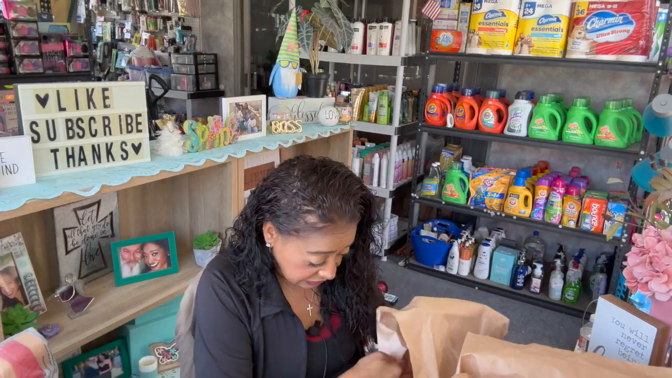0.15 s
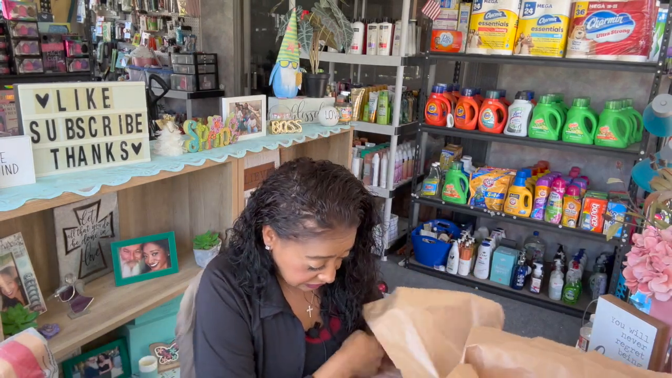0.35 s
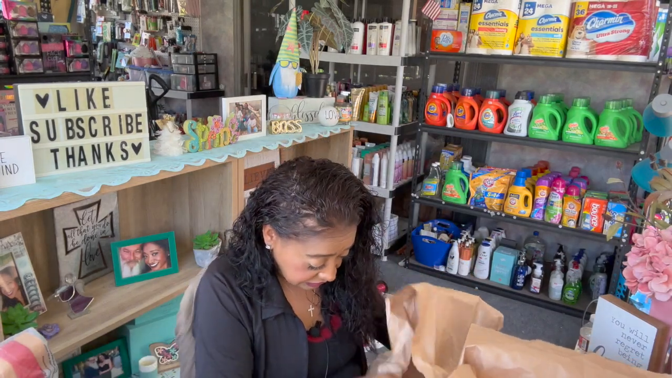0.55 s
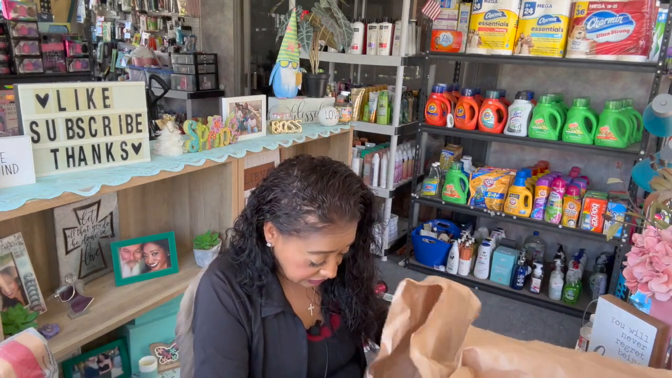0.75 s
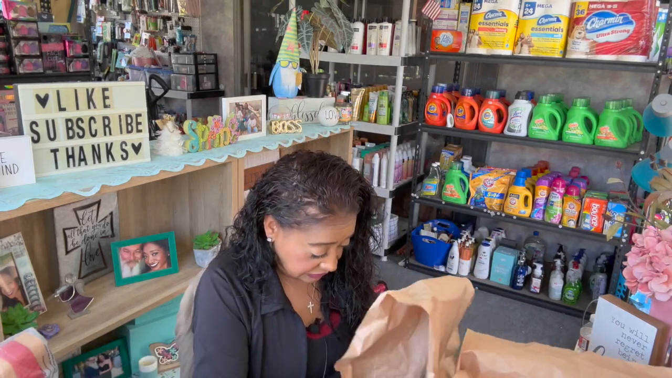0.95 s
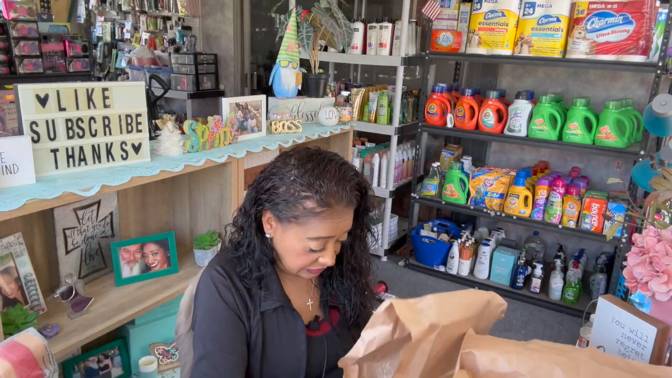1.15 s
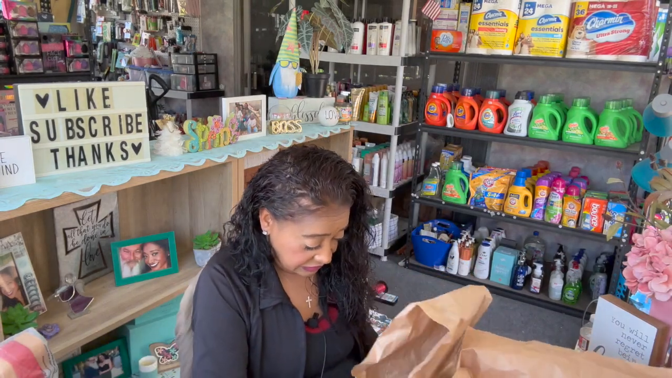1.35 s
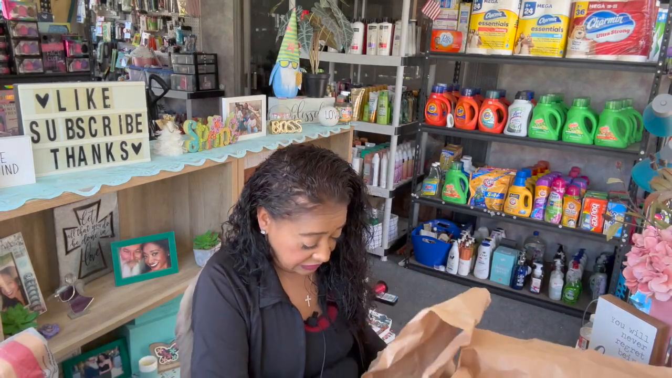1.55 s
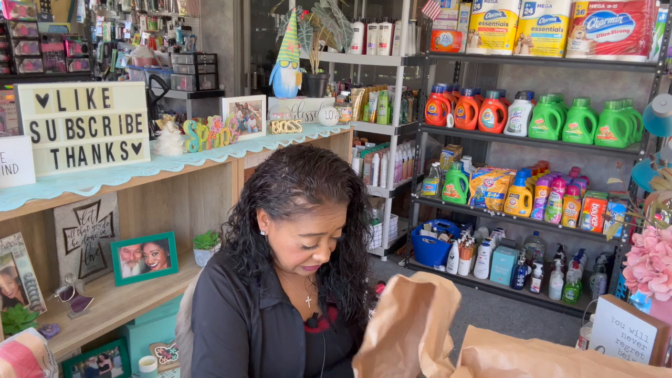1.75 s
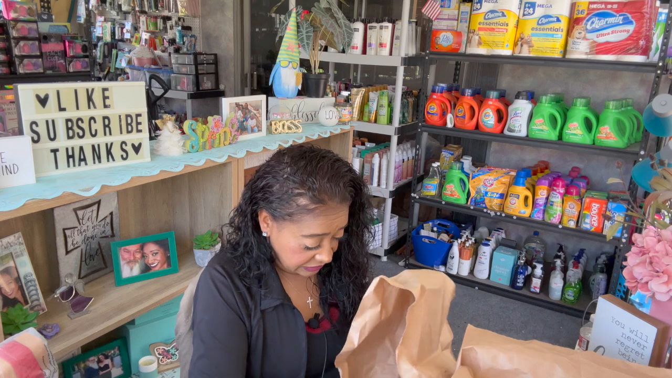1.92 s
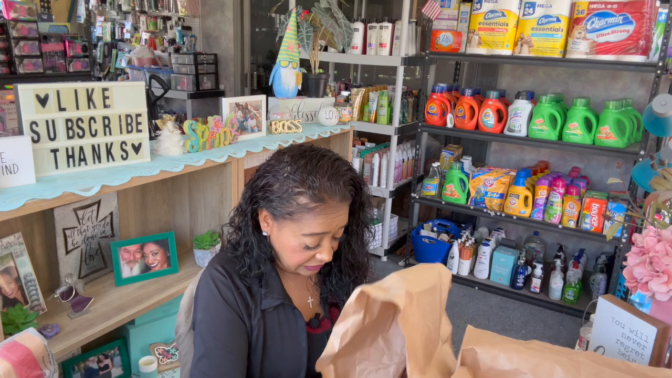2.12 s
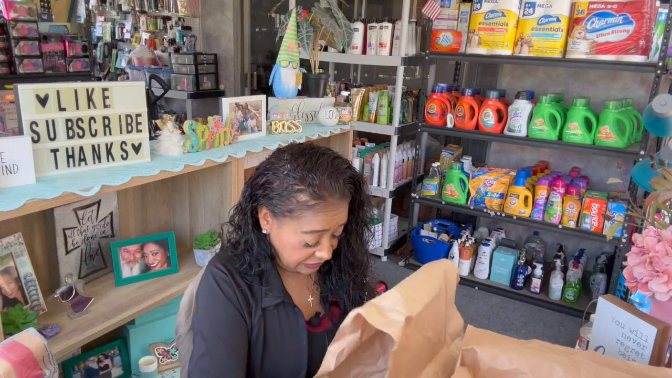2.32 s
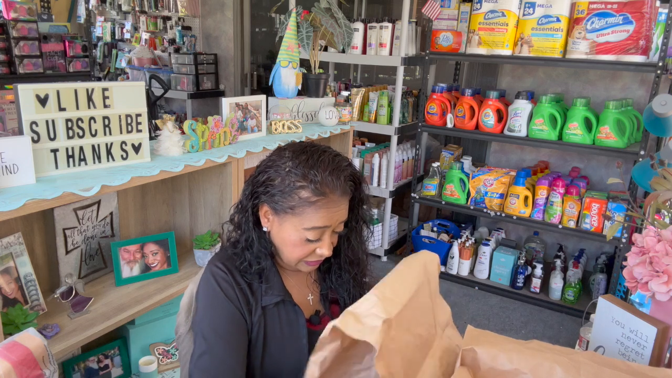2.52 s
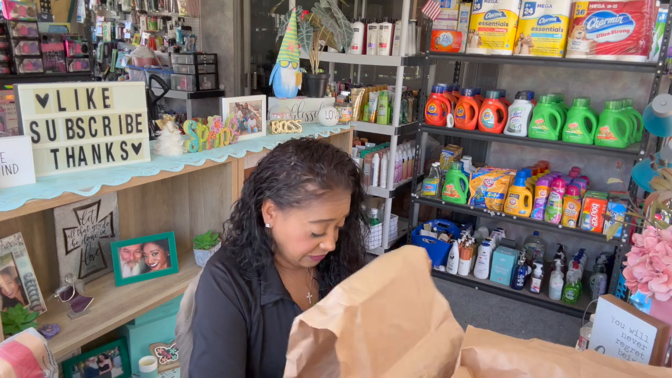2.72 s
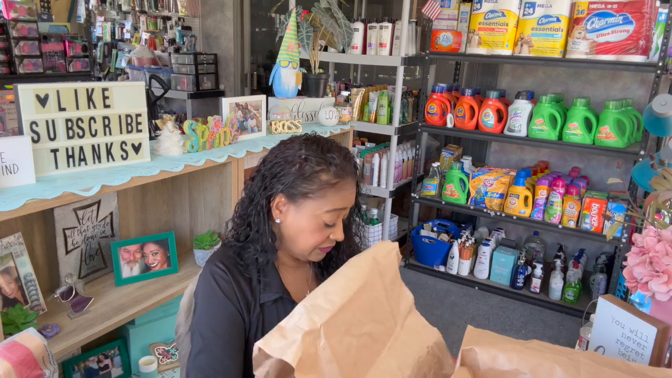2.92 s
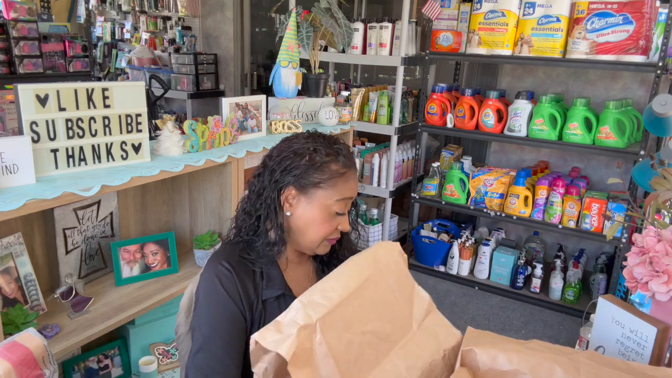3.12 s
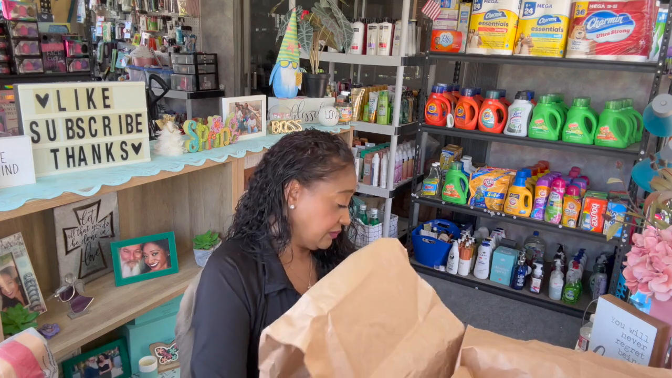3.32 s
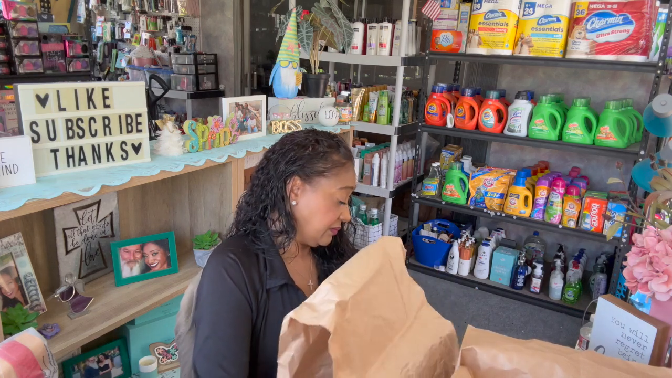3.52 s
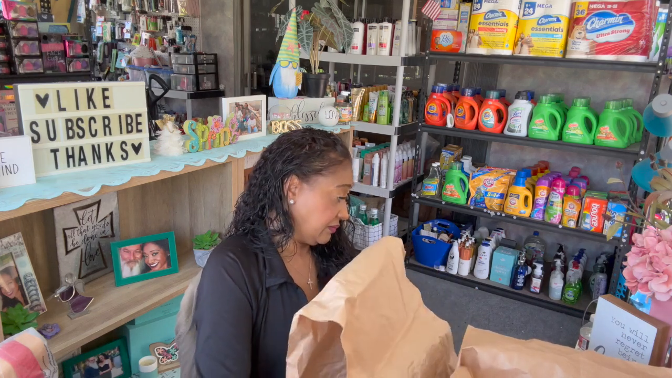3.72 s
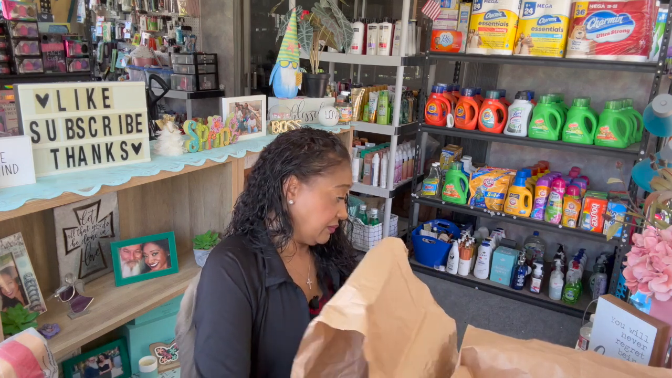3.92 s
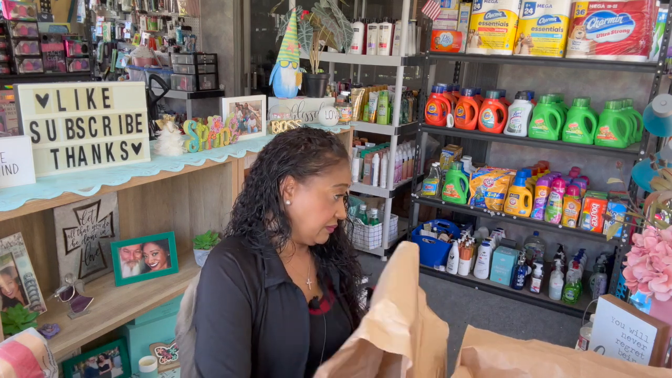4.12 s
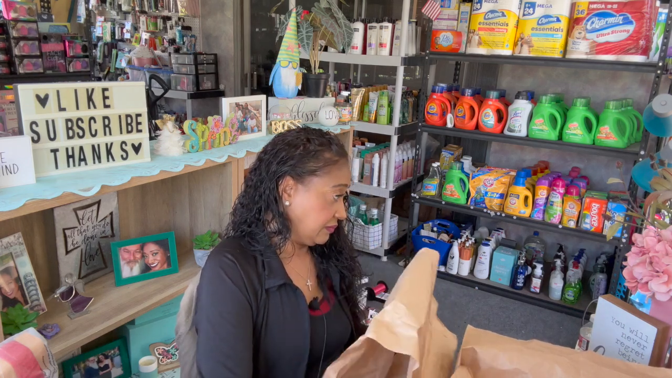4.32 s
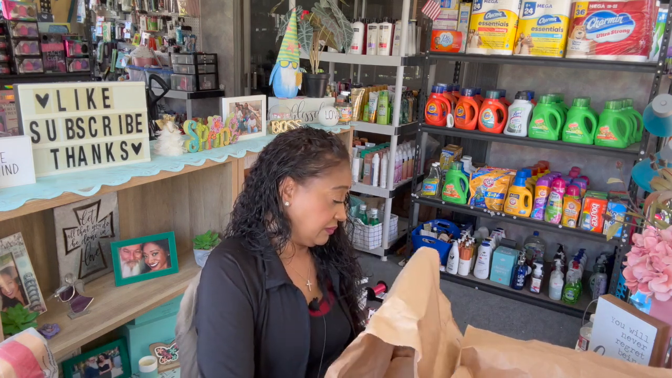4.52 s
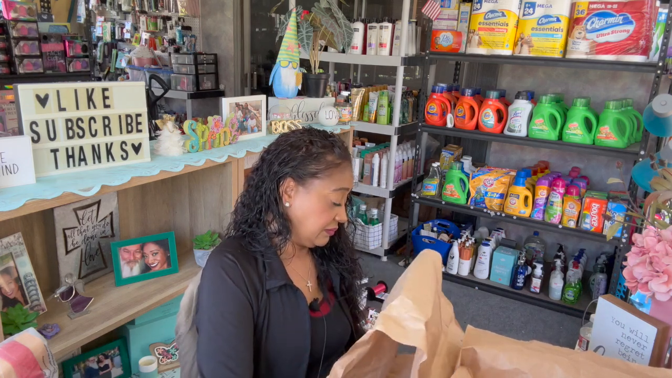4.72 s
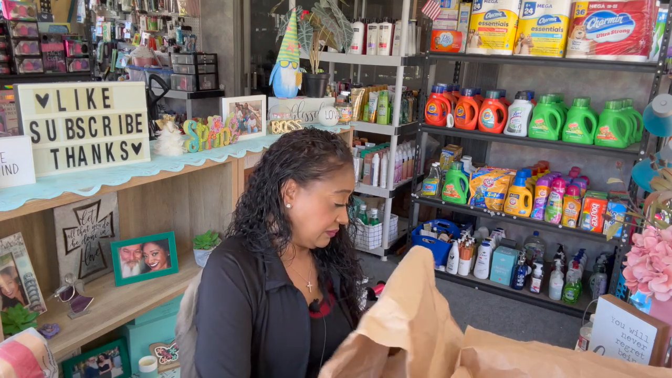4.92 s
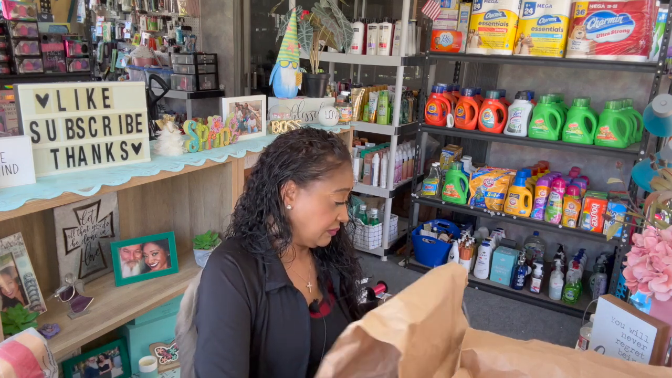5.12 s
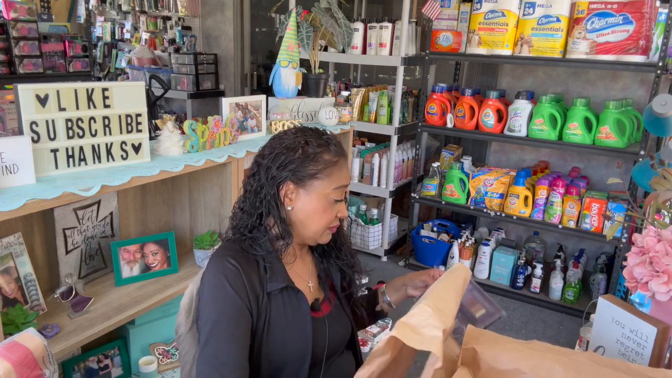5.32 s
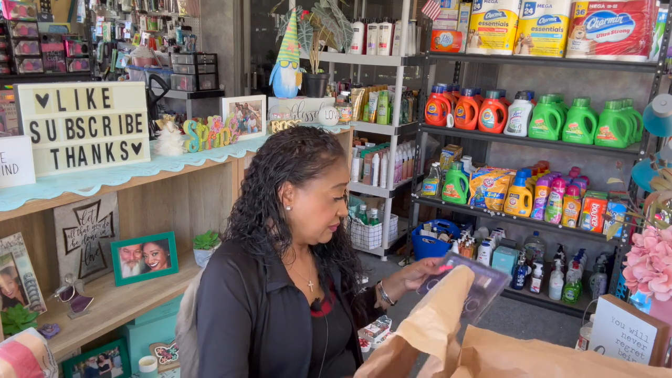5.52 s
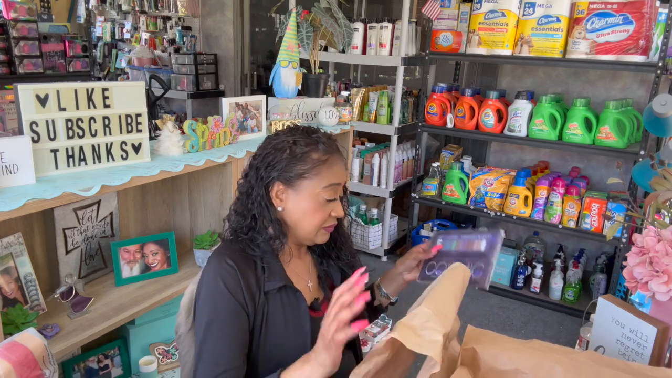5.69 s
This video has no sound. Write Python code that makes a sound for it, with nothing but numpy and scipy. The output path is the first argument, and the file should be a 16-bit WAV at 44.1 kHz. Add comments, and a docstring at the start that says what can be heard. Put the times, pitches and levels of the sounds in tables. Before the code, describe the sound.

A person digs through crinkly kraft paper, heard near the microphone indoors. Uneven squeezes come several times a second, each a burst of fine crackles and dry rustling, dotted with bright ticks and duller pops. A few low, soft thumps of moving paper peak just before three seconds. The handling then lightens, briefly picks up around five seconds, and dies to faint rustle. The room is dry, with little echo and slightly softened top treble.

```python
"""A small, well-filled room, where hands crumple a large sheet of kraft paper close by.
Countless small creases crackle in clumps and paper rubs on paper: clouds of tiny rings mixed with noise.
Larger creases snap one by one, each a decaying tone of its flat facet with bursts of coloured noise.
The whole sheet flaps in the bass and pushes air in soft, damped swings.
A short echo of the room and a faint noise hiss lie around it."""
import sys
import numpy as np
from scipy import signal
from scipy.fft import rfft, irfft, next_fast_len
from scipy.io import wavfile
from scipy.ndimage import uniform_filter1d, map_coordinates

SR = 44100
rng = np.random.default_rng(int(sys.argv[2]) if len(sys.argv) > 2 else 0)


def wrap_up_sound(samples):
    """Save the sound to the file named by the first command line argument, as 16-bit audio."""
    columns = np.atleast_2d(samples).T
    # keep every value between -1 and 1, then stretch to whole-number steps
    tamed = np.clip(columns, -1, 1)
    steps = np.round(tamed * 32767).astype(np.int16)
    wavfile.write(sys.argv[1], SR, steps)


N = 253833  # length in samples

# Squeezes of the paper. Each row: peak time in seconds, swell in seconds, fade in seconds,
# crackle level in dB, rub level in dB over the crackle, flap level in dB over the crackle.
SQUEEZES = [(0.01, 0.079, 0.19, -29, 0, -6), (0.152, 0.031, 0.091, -36, -9.5, -3.5),
            (0.214, 0.0091, 0.078, -30.5, 1, -13), (0.312, 0.055, 0.19, -26, -1.5, -5.5),
            (0.45, 0.095, 0.22, -29, -4, -4), (0.515, 0.028, 0.018, -30, -1.5, 5),
            (0.638, 0.035, 0.046, -27.5, -18, -5.5), (0.72, 0.024, 0.12, -39.5, -11, -24),
            (0.8, 0.02, 0.21, -35, -16, -10), (0.9, 0.12, 0.4, -30, -13.5, -4),
            (1.038, 0.056, 0.12, -25.5, -7.5, -9.5), (1.133, 0.057, 0.06, -33, -1, -5.5),
            (1.21, 0.016, 0.21, -43.5, -1, -6.5), (1.633, 0.086, 0.053, -37, 9.5, -24),
            (1.654, 0.041, 0.1, -25.5, -5, -7), (1.8, 0.12, 0.57, -33, -5.5, -11.5),
            (1.87, 0.029, 0.17, -35, 4.5, -11), (2.01, 0.091, 0.02, -25.5, -0.5, 1),
            (2.07, 0.026, 0.22, -46, -12.5, -3.5), (2.206, 0.084, 0.06, -21.5, 2, -5),
            (2.397, 0.053, 0.022, -33, -1.5, -10), (2.51, 0.036, 0.18, -32.5, 3, -4.5),
            (2.609, 0.069, 0.041, -37.5, -1, 4), (2.721, 0.013, 0.25, -26.5, -4, -6),
            (2.798, 0.08, 0.11, -27, -3, -1.5), (2.995, 0.0097, 0.069, -37, -27, -5),
            (3.142, 0.063, 0.059, -41, 3, -1), (3.243, 0.062, 0.035, -28.5, 3.5, -10.5),
            (3.299, 0.009, 0.042, -44.5, 10.5, 2), (3.382, 0.027, 0.016, -36.5, -32, -13),
            (3.462, 0.042, 0.033, -48.5, 2, -3.5), (3.544, 0.031, 0.037, -49, -5.5, 6),
            (3.644, 0.031, 0.14, -41.5, 1, -13.5), (3.853, 0.0052, 0.05, -30, -3, -8.5),
            (3.935, 0.053, 0.12, -41.5, -2.5, -5), (4.105, 0.021, 0.067, -35.5, 0, -3),
            (4.19, 0.14, 0.041, -47.5, 10, -3.5), (4.252, 0.021, 0.017, -42.5, -25, 0.5),
            (4.416, 0.014, 0.16, -50.5, 15.5, -27), (4.468, 0.035, 0.085, -39, -1, 2.5),
            (4.573, 0.019, 0.03, -46.5, 3, 6.5), (4.64, 0.037, 0.11, -49, 9, 5.5),
            (4.693, 0.029, 0.09, -34, -0.5, -5.5), (4.83, 0.014, 0.23, -33, 0.5, -13.5),
            (4.93, 0.12, 0.067, -32, 5, -10), (5.021, 0.011, 0.042, -29.5, -4.5, -9.5),
            (5.078, 0.035, 0.071, -29.5, 2.5, -1.5), (5.191, 0.045, 0.035, -34.5, 3, -1.5),
            (5.545, 0.013, 0.086, -61.5, -12, 18.5), (5.657, 0.015, 0.083, -53.5, 13, -13)]
SWING_DB = 20  # how far a squeeze climbs in its swell time and sinks in its fade time
ROUNDNESS = 1.62  # exponent; over 1 gives a broad top and steep ends

# Paper settling between squeezes. Each row: time in seconds, crackle level in dB.
SETTLING = [(0, -54), (0.7, -47), (1.2, -48), (1.45, -48.5), (2.05, -44), (2.44, -47.5), (3.1, -72),
            (3.5, -59.5), (4.05, -56.5), (4.29, -56.5), (4.39, -66), (4.6, -46), (5.23, -48), (5.52, -79.5),
            (5.6, -60.5), (5.76, -69)]
SETTLING_RUB_DB, SETTLING_FLAP_DB = -6.5, -8.5  # over the settling crackle

# Tone colours of the small creases, the rubbing and the flapping sheet.
# Each row: frequency in Hz, relative level in dB per Hz.
CRACKLE_COLOUR = [(500, -12), (1050, -10.5), (1900, -5), (3500, -8), (6000, -15.5), (12000, -41.5)]
RUB_COLOUR = [(2500, -24.5), (5000, -7), (8000, -4.5), (12000, -8), (15000, 1)]
FLAP_COLOUR = [(20, -23.5), (45, 1), (90, -2.5), (220, -3), (480, 4.5), (800, 0.5), (1300, -17.5)]

# Creases that snap. Each row: time in seconds, 1 ms before the snap sounds, relative level in dB,
# facet pitch in Hz, relative level of the treble crack in dB.
SNAPS = [(0.05, -6, 10640, -6), (0.062, -18, 9200, -7.5), (0.106, -21.5, 9300, -6.5),
         (0.141, -20.5, 1810, -0.5), (0.15, -12, 726, -30.5), (0.181, -9, 389, -24),
         (0.212, -9.5, 708, -9.5), (0.293, -13, 3304, -1.5), (0.311, -11.5, 2400, 4),
         (0.33, -6.5, 10400, -6), (0.345, -19, 445, 12), (0.359, -17.5, 540, 8), (0.505, -8, 1760, 1),
         (0.511, -21.5, 2500, 7), (0.563, -10.5, 721, -23), (0.579, -12, 2760, -11),
         (0.616, -22.5, 305, 13.5), (0.631, -21, 550, 3), (0.696, -19, 2240, -9), (0.787, -13.5, 1780, -53),
         (0.884, -15, 2300, -34), (0.938, -19.5, 1410, 2.5), (0.996, -20, 9500, -12),
         (1.014, -14.5, 3390, -6.5), (1.03, -13.5, 1500, -2), (1.103, -16, 1770, -20.5),
         (1.121, -12.5, 6840, -29), (1.144, -18.5, 1820, -22), (1.197, -14, 10100, -9.5),
         (1.24, -19, 1800, -15), (1.255, -18.5, 5130, -32), (1.285, -18, 6640, -53),
         (1.321, -19.5, 405, -8.5), (1.382, -29, 4700, -44), (1.451, -23.5, 2570, -46),
         (1.477, -21.5, 1790, -18.5), (1.534, -18.5, 1810, -46), (1.577, -20, 6900, -24),
         (1.648, -16.5, 724, -9), (1.749, -22, 2360, 5.5), (1.806, -21, 594, -6), (1.847, -9.5, 6420, -24),
         (1.854, -5.5, 6650, -21.5), (1.877, -17, 6000, -11.5), (1.919, -7, 2070, -6.5),
         (1.998, -14, 1890, -2), (2.01, -7, 1790, -9.5), (2.057, -17.5, 2100, -2.5),
         (2.091, -21.5, 2320, -11), (2.155, -11.5, 2020, -7.5), (2.201, -4.5, 7400, -11),
         (2.212, -3, 6900, -7.5), (2.283, -20, 1300, -25), (2.334, -15, 410, -39.5),
         (2.368, -23.5, 3330, -16), (2.485, -15, 2410, -1.5), (2.514, -19, 1330, -4), (2.527, -17, 323, -4),
         (2.569, -11, 3140, -26.5), (2.597, -11.5, 1470, -29.5), (2.623, -16.5, 1820, -6.5),
         (2.711, -11.5, 2260, -41), (2.743, -10.5, 477, 1), (2.774, -7, 1460, -1), (2.797, -7, 1380, 3.5),
         (2.848, -9, 2170, -37), (2.918, -16.5, 2320, -29), (2.99, -19.5, 2600, -25.5),
         (3.017, -20.5, 3770, -33), (3.106, -16.5, 2240, -7.5), (3.21, -14.5, 6200, -40),
         (3.259, -8.5, 1320, -25), (3.281, -23, 1710, -25.5), (3.293, -23, 3240, -3),
         (3.368, -23, 1110, -38.5), (3.419, -32.5, 472, 2), (3.452, -28, 2070, 1.5),
         (3.516, -20.5, 3010, -24.5), (3.54, -8, 674, -9), (3.809, -18, 1860, -23),
         (3.832, -20.5, 624, -31), (3.854, -22.5, 1200, -7.5), (3.865, -19, 3600, -22),
         (3.876, -24, 2060, -1.5), (3.915, -20, 1060, -16.5), (3.936, -20, 3370, -0.5),
         (3.977, -23.5, 2240, -50), (4.037, -28.5, 660, -42), (4.095, -35, 2000, -19),
         (4.127, -18.5, 3450, -20.5), (4.185, -19.5, 1870, -4.5), (4.248, -22.5, 4920, -35),
         (4.311, -30, 770, -41), (4.413, -14, 3010, -10.5), (4.462, -19.5, 400, -17.5),
         (4.483, -18.5, 1470, -11), (4.523, -21, 2070, -31), (4.564, -19, 2460, -29),
         (4.577, -21, 1430, -33), (4.635, -16, 1660, -34), (4.69, -9, 1750, -54), (4.763, -17.5, 1840, -45),
         (4.821, -14.5, 1690, -24), (4.83, -17, 1880, 2.5), (4.887, -19.5, 1710, 3),
         (5.017, -14.5, 627, -16.5), (5.069, -10, 1650, -18), (5.077, -12.5, 7500, -5),
         (5.155, -18, 1960, -21), (5.189, -9, 375, -3.5), (5.366, -40, 2860, -26), (5.419, -47, 4900, -40),
         (5.54, -23.5, 1340, -20), (5.58, -23.5, 1184, -40)]

# The whole sheet buckles and pushes air. Each row: start in seconds, relative level in dB, pitch in Hz.
THUDS = [(0.51, -15.5, 182), (1.991, -21, 203), (2.325, -22.5, 141), (2.508, -18, 184), (2.742, -14, 72.4),
         (2.839, -11.5, 75), (2.871, -7, 129), (3.768, -25, 123), (4.437, -19.5, 123), (5.19, -16.5, 152)]

# Decay of the room. Each row: frequency in Hz, time to fall 60 dB in seconds.
ROOM_DECAY = [(200, 0.25), (2000, 0.11), (10000, 0.032)]

# Tone colour of the faint hiss. Each row: frequency in Hz, relative level in dB per Hz.
HISS_COLOUR = [(40, -6), (1030, -10.5), (15000, -49)]

# Treble droop of the microphone. Each row: frequency in Hz, gain in dB.
MIC_RESPONSE = [(11000, -0.5), (14000, -8.5), (16000, -25)]
BAND_LIMIT_HZ = 15900


def amp(db):
    """Turns dB into gain."""
    return 10 ** (np.asarray(db) / 20)


def unit(x):
    """Scales x to rms 1."""
    return x / np.sqrt(np.mean(x ** 2) + 1e-20)


def along(points, hz):
    """Reads a curve of (Hz, value) points on a log frequency axis."""
    f, value = np.transpose(points)
    return np.interp(np.log(hz + 1), np.log(f + 1), value)


def wobble(rate):
    """Draws a smooth random curve with rate knots a second."""
    knots = rng.standard_normal(int(N * rate / SR) + 4)
    return map_coordinates(knots, [np.arange(N) * rate / SR])


def filtered(x, response):
    """Multiplies the spectrum of x by a response of frequency."""
    size = next_fast_len(N + SR // 2)
    spectrum = rfft(x, size) * response(np.fft.rfftfreq(size, 1 / SR))
    return irfft(spectrum, size)[..., :N]


def coloured(x, colour):
    """Filters x through a tone colour and scales it to rms 1."""
    return unit(filtered(x, lambda hz: amp(along(colour, hz))))


def patchy(x, depth_db, size):
    """Gives x a random gain that drifts smoothly over frequency and time; size is in frames."""
    z = signal.stft(x, nperseg=256)[2]
    field = uniform_filter1d(rng.standard_normal(z.shape), 4, -2)
    field = uniform_filter1d(field, size, -1)
    return signal.istft(z * amp(depth_db * unit(field)), nperseg=256)[1][..., :x.shape[-1]]


def grains(count, hz, octaves, cycles, spread_db, size):
    """Scatters short damped rings of varied pitch, level and life; size is in samples."""
    start, pitch, power, life = rng.random((count, 4)).T
    f = np.clip(hz * 2 ** (octaves * (2 * pitch - 1)), 20, SR / 2.2)[:, None]
    t = np.arange(size) / SR
    # many soft grains and few loud ones
    gain = amp(spread_db * np.minimum(-np.log(power + 1e-9), 4))[:, None] * np.sqrt(f)
    age = t * f / (cycles * (.5 + life[:, None]))
    swell_and_decay = age * np.exp(-age)  # the fold gives way over a few cycles
    wave = gain * np.sin(2 * np.pi * f * t) * swell_and_decay
    where = (start * N).astype(int)[:, None] + np.arange(size)
    return np.bincount(where.ravel(), wave.ravel(), N + size)[:N]


def squeezes():
    """Gains of crackle, rub and flap: each squeeze swells and fades over the settling paper."""
    t = np.arange(N) / SR
    settling_db = np.interp(t, *np.transpose(SETTLING))
    # powers are summed, hence the doubled dB
    power = amp(2 * (settling_db + np.array([[0], [SETTLING_RUB_DB], [SETTLING_FLAP_DB]])))
    for s, swell, fade, db, rub_db, flap_db in SQUEEZES:
        near = slice(max(round((s - 4 * swell) * SR), 0), round((s + 4 * fade) * SR))
        away = np.maximum((s - t[near]) / swell, (t[near] - s) / fade)
        peak = amp(2 * np.array([[db], [db + rub_db], [db + flap_db]]))
        power[:, near] += peak * amp(-2 * SWING_DB * away ** ROUNDNESS)
    return np.sqrt(power)


def small_creases(clump_db):
    """Small creases give way in clumps: brief rings over noise, with a patchy spectrum."""
    rings = unit(grains(count=8000, hz=2412, octaves=1.826, cycles=1.71, spread_db=3.5, size=500))
    crackle = patchy(rings + 0.8 * rng.standard_normal(N), depth_db=3, size=40)
    return coloured(amp(clump_db) * crackle, CRACKLE_COLOUR)


def rubbing(clump_db):
    """Paper slides on paper: high rings of more cycles in a bed of noise, rough in level."""
    rings = unit(grains(count=9000, hz=8410, octaves=0.895, cycles=7.2, spread_db=4.0, size=260))
    rub = patchy(rings + 1.6 * rng.standard_normal(N), depth_db=5.0, size=24)
    return coloured(amp(1.14 * clump_db + 1.6 * wobble(60)) * rub, RUB_COLOUR)


def flapping(clump_db):
    """The whole sheet flaps in the bass: low, heavily damped rings under noise."""
    rings = unit(grains(count=1200, hz=326.0, octaves=1.38, cycles=0.39, spread_db=4.5, size=2000))
    flap = rings + 2.68 * rng.standard_normal(N)
    return coloured(amp(0.73 * clump_db + 1.0 * wobble(29.96)) * flap, FLAP_COLOUR)


def hands():
    """The effort of the hands sets crackle, rub and flap, which share their clumps."""
    clump_db = 0.32 * wobble(25) + 3.23 * wobble(95)
    layers = [small_creases(clump_db), rubbing(clump_db), flapping(clump_db)]
    return np.sum(squeezes() * layers, axis=0)


def early(spectrum):
    """Turns a spectrum into a burst with a spread of 1 over its first milliseconds."""
    burst = irfft(spectrum)
    return burst / np.std(burst[30:160])


def snaps():
    """Each crease rings its facet, rattles the folds around it and cracks in the treble, in its own colour."""
    out, t = np.zeros(N + SR), np.arange(4096) / SR
    f = np.fft.rfftfreq(len(t), 1 / SR) + 1  # 1 Hz up, to keep off zero
    knots = np.arange(0, SR / 2, 350)  # Hz between steps of the random colour
    delay = round(.001 * SR)  # each snap sounds 1 ms after its listed time
    fade = amp(-60 * t / 0.013) + 0.036 * amp(-60 * t / 0.12)  # a quick drop, then a weak tail
    linger = 0.051 * amp(-60 * t / .07)
    for s, db, hz, crack_db in SNAPS:
        colour = amp(6.34 * np.interp(f, knots, rng.standard_normal(len(knots))))
        noise = colour * rfft(rng.standard_normal(len(t)))
        rattle = early(noise / (1 + (np.log2(f / hz) / 0.81) ** 6))
        kin = unit(irfft(noise / (1 + (np.log2(f / hz) / 0.27) ** 4)))  # facets of like size ring on
        crack = early(noise / (1 + (4200 / f) ** 2))
        life = 1 / (1 / 0.03 + hz / 130)  # seconds to fall 60 dB; small facets die sooner
        rise = 1 - np.exp(-(t / (0.00065 + 0.5 / hz)) ** 2)  # large facets give way more slowly
        facet = np.sin(2 * np.pi * hz * t) * amp(-60 * t / life)
        burst = (0.4 * rattle + 1.1 * amp(crack_db) * crack) * fade
        blow = 0.7 * facet + burst + kin * linger
        out[round(s * SR) + delay:][:len(t)] += amp(db) * rise * blow
    return out[:N]


def thuds():
    """The sheet buckles in one soft swing that pushes air and is soon damped."""
    out, t = np.zeros(N + SR), np.arange(SR // 8) / SR
    for s, db, hz in THUDS:
        swell_and_decay = 3.16 * hz * t * np.exp(-2.8 * hz * t)
        out[round(s * SR):][:len(t)] += amp(db) * swell_and_decay * np.sin(2 * np.pi * hz * t)
    return out[:N]


def room(x):
    """The room answers with a noise tail in which each frequency dies at its own speed."""
    hz, t, z = signal.stft(rng.standard_normal(SR // 2), SR, nperseg=256)
    decay = amp(-60 * t / along(ROOM_DECAY, hz)[:, None])
    tail = signal.istft(z * decay, SR, nperseg=256)[1]
    delayed = np.pad(x, (200, 0))  # samples before the tail begins
    return signal.fftconvolve(delayed, tail / np.linalg.norm(tail))[:N]


def faint_hiss():
    """A steady noise floor, strongest in the bass and falling toward the treble."""
    return amp(-87.5) * coloured(rng.standard_normal(N), HISS_COLOUR)


def scene():
    """Mixes the paper, its echo in the room and the faint hiss."""
    paper = hands() + snaps() + thuds()
    return (paper + amp(-14.0) * room(paper) + faint_hiss())[None]


def record(dry):
    """The microphone droops in the treble; the sound holds nothing above the band limit."""
    return filtered(dry, lambda hz: amp(along(MIC_RESPONSE, hz)) * (hz < BAND_LIMIT_HZ))


dry = scene()
out = record(dry)
wrap_up_sound(out)
```